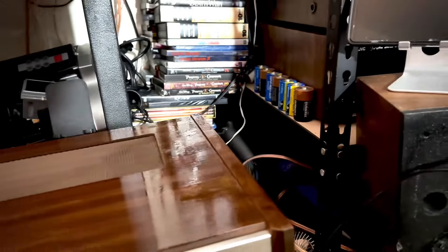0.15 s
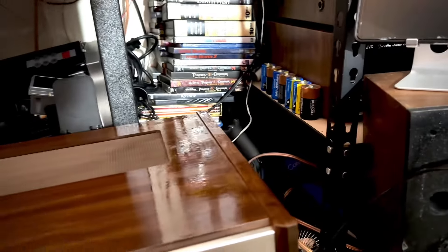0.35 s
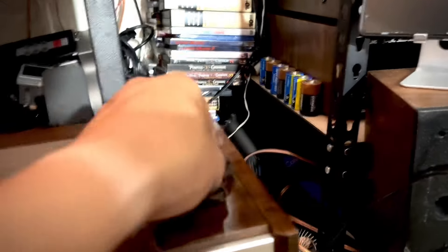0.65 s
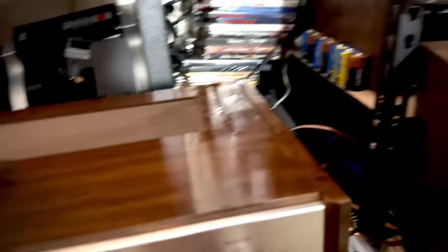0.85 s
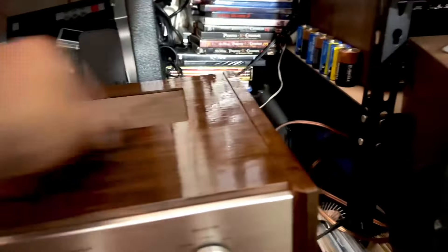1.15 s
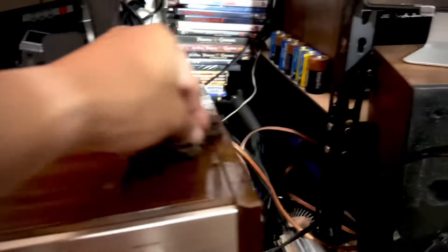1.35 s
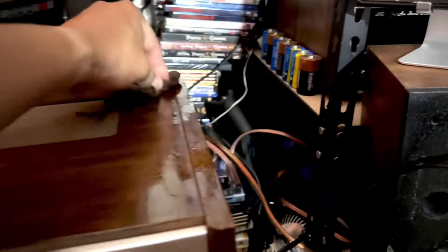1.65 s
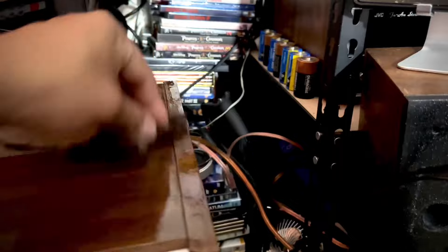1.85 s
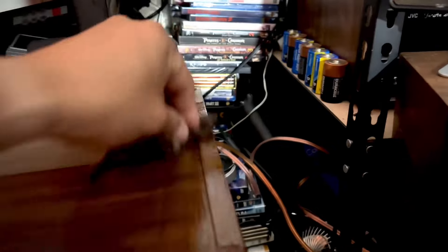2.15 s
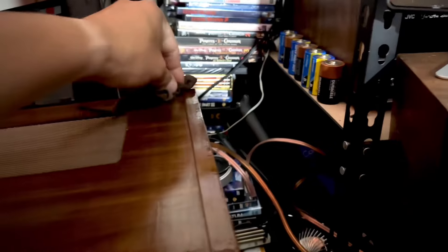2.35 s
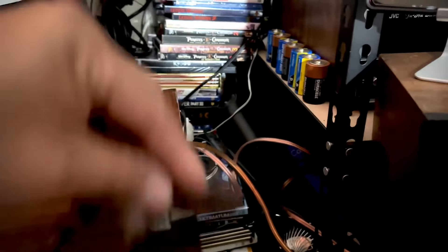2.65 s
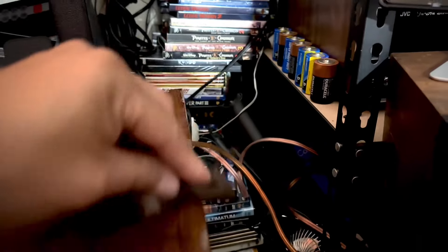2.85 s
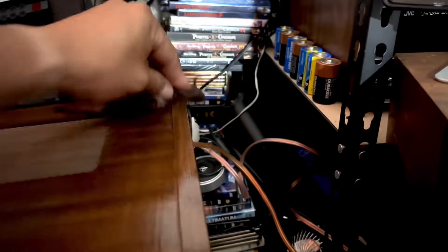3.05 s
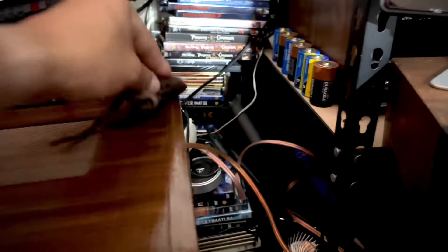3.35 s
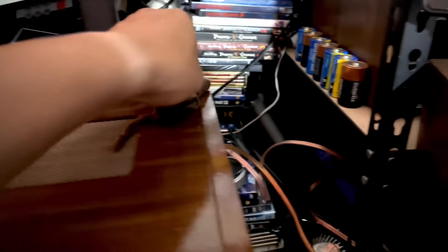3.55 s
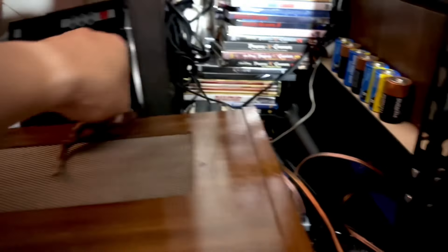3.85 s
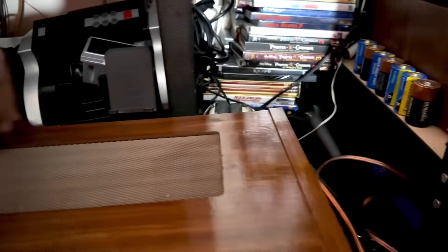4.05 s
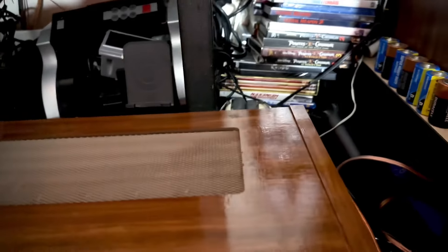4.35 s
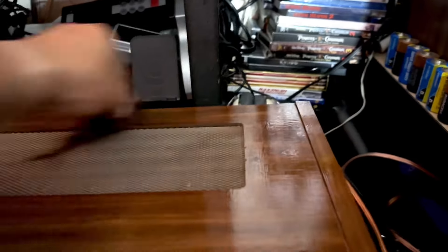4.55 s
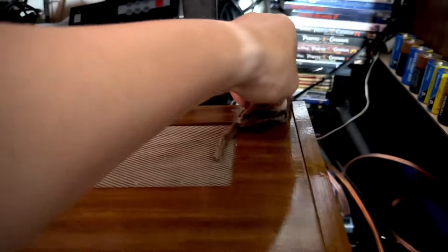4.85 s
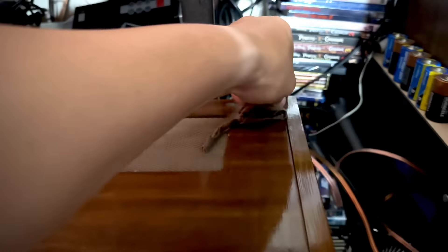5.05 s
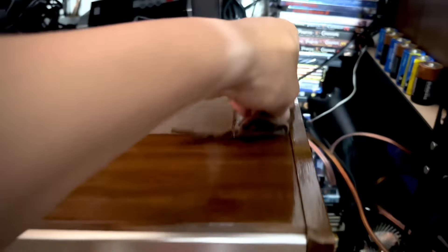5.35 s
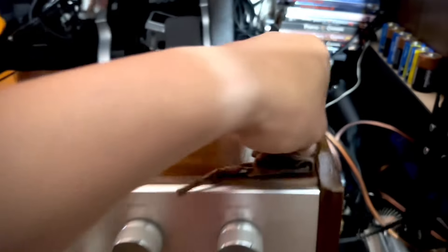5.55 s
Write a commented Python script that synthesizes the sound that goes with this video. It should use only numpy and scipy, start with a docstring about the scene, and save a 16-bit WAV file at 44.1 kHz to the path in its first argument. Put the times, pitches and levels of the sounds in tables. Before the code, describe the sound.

Very close stereo sound in a small, crowded room, with a short dull reflection and quiet low hum. From 0 to 1.7 s a folded rag makes five bright, breathy swishes on varnished wood, roughly 0.35 to 0.45 s each, swelling with hand speed and dipping at the turns; small catches tick near 0.4 and 1.0 s. From 1.7 to 2.4 s strokes are stronger, with a rasping woody judder at 1.9 s and a hollow rustle after it. From 2.4 to 3.5 s the rubbing is duller and woodier, with light bumps at 2.6, 3.1 and 3.3 s. A long stroke from 3.55 to 4.3 s carries thin, fuzzy squeaks and soft knocks around 4.0 to 4.1 s. After a brief dip, a muffled thud at 4.5 s leads to a loud scrubbing burst at 4.65 s. It quietens around 4.9 to 5.1 s, then a bump at 5.27 s and a softer wipe fading to the end.

```python
"""A small room, close to the microphone: a folded rag is wiped back and forth over a radio's varnished wooden case.
The fibres are shaped noise that hisses brighter as the hand speeds up; the cloth sticks and slips and rings the case.
Noise in bands and resonances adds scuffs, judders, soft coloured rubbing, catches, faint squeaks and a rim rustle.
The hand knocks softly on the panel: short decaying sines. Wavering low hum and rumble lie underneath."""
import sys
import numpy as np
from scipy import signal
from scipy.fft import rfft, irfft
from scipy.io import wavfile
from scipy.ndimage import map_coordinates

SR = 44100
rng = np.random.default_rng(int(sys.argv[2]) if len(sys.argv) > 2 else 0)


def waveform_to_disk(signal):
    """Save audio, clipped to [-1, 1], as 16-bit WAV at the path in sys.argv[1]."""
    frames = np.transpose(np.atleast_2d(signal))
    scaled = np.clip(frames, -1, 1) * 32767
    samples = np.round(scaled).astype(np.int16)
    wavfile.write(sys.argv[1], SR, samples)


N = 251811
TIME = np.arange(N) / SR
FREQS = np.fft.rfftfreq(N, 1 / SR)

# sweeps of the rag, with faint brushing that keeps the turns and pauses from falling silent; levels at full speed:
# (start [s], end [s], speeding up [s], slowing down [s],
# hiss [dB], top treble over the hiss [dB], coarse sizzle over the hiss [dB],
# then over the hiss, before the trims in wood(): hollow thrum [dB], panel rasp [dB], dry scrape [dB],
# pressure gained from start to end [dB])
STROKES = [(-0.15, 0.318, 0.3, 0.27, -48.5, 6.5, -4.5, -27, -15.5, -8.5, 13),
           (0.22, 0.667, 0.23, 0.093, -48, 3, -2, -13, -13.5, -11.5, -2.5),
           (0.648, 1.001, 0.16, 0.1, -48.5, 4.5, -3.5, -16.5, -13.5, -8, -2),
           (0.987, 1.338, 0.079, 0.18, -47.5, 4.5, -2.9, -8, -12.5, -12.5, 13),
           (1.299, 1.717, 0.18, 0.1, -48.5, 2, -4.5, -11, -11, -7, 2),
           (1.714, 2.043, 0.16, 0.16, -45, 5.5, -6, 0, -5, -5.5, 7.5),
           (1.992, 2.411, 0.089, 0.27, -45, 3.5, -7.5, -5, -12.5, -3, 10),
           (2.3, 2.761, 0.14, 0.25, -52.5, -15, -4, 2, -6, -11, 4.5),
           (2.681, 3.17, 0.18, 0.17, -51.5, -0.5, -4, -11.5, -3, 0, 6.5),
           (3.12, 3.324, 0.03, 0.085, -74.5, -22, 3, 5, -6, 1.5, -12),
           (3.302, 3.563, 0.22, 0.14, -52.5, -9, -0.5, 2.5, -4, -1, 6.5),
           (3.555, 4.278, 0.12, 0.088, -51, -3, -4.5, 2, -2.5, -1, 5.5),
           (4.222, 4.381, 0.044, 0.032, -64, -20, 5, -11, 2, 0.5, 12),
           (4.322, 4.837, 0.17, 0.19, -44.5, -7, -2, -4.5, -2.5, 1, -5.5),
           (4.784, 4.883, 0.02, 0.2, -64.5, -3, 4, 13, -1, -7, -16),
           (4.904, 5.074, 0.28, 0.042, -58.5, -7.5, 5.5, 0.5, -7, -1, 1),
           (5.05, 5.172, 0.03, 0.03, -80.5, -13, -1, 9, -2, -4, -4),
           (5.118, 5.78, 0.15, 0.32, -50, -6, 1, 0, -11, -4.5, -7)]


def amp(db):
    """Decibels to gain."""
    return 10 ** (np.asarray(db) / 20)


def unit(x):
    """Scales to rms 1."""
    return x / np.sqrt(np.mean(x ** 2) + 1e-20)


def over_hz(table, hz, order=1):
    """Reads one column of a table on a log-frequency axis."""
    columns = np.transpose(table)
    return np.interp(np.log(hz + 1), np.log(columns[0] + 1), columns[order])


def over_time(table, t=TIME):
    """Reads all columns of a curve at the times t."""
    s, *columns = np.transpose(table)
    return [np.interp(t, s, c) for c in columns]


def filtered(x, response):
    """Applies a frequency response."""
    return irfft(rfft(x) * response, N)


def resonance(hz, width_hz):
    """Response of one damped mode, gain 1 at its peak."""
    return 1j * FREQS * width_hz / (hz ** 2 - FREQS ** 2 + 1j * FREQS * width_hz)


def drift(rate_hz):
    """Smooth random curve of rms 1; its movement fades out above the given rate."""
    return unit(filtered(rng.standard_normal(N), np.exp(-(FREQS / rate_hz) ** 2)))


def whistle(hz, width_hz):
    """Noise in a resonance that follows the curve hz; one row for each port."""
    noise = rng.standard_normal((2, N)) + 1j * rng.standard_normal((2, N))
    r = np.exp(-np.pi * width_hz / SR)
    band = signal.lfilter([1], [1, -2 * r, r * r], noise)
    carrier = np.exp(2j * np.pi * np.cumsum(hz) / SR)
    return unit((band * carrier).real)


def sweep(start, end, rise, fall):
    """Speed of the hand, 0-1: it picks up, holds and slows to a stop."""
    up, down = np.clip([(TIME - start) / rise, (end - TIME) / fall], 0, 1)
    return np.sin(np.pi / 2 * up) * np.sin(np.pi / 2 * down)


def hand():
    """Sweep speed and pressure give hiss, brightness and sizzle [dB] and three drives of the wood [gain]."""
    # dB gained per dB of speed; wood: thrum, rasp, scrape
    hiss_law, bright_law, wood_laws = 0.9, 0.88, (0.61, 0.79, 0.81)
    power, colour, drives = np.full(N, 1e-12), np.zeros((2, N)), np.zeros((3, N))
    for start, end, rise, fall, hiss_db, bright_db, sizzle_db, *wood_db, press_db in STROKES:
        speed = sweep(start, end, rise, fall)
        on = speed > 0
        speed_db = 20 * np.log10(speed[on])
        progress = (TIME[on] - start) / (end - start)
        hiss = amp(hiss_db + hiss_law * speed_db) ** 2
        power[on] += hiss
        # overlapping sweeps share the colour by their power
        colour[0, on] += hiss * (bright_db + bright_law * speed_db)
        colour[1, on] += hiss * sizzle_db
        for drive, db, law in zip(drives, wood_db, wood_laws):
            drive_db = hiss_db + db + law * speed_db + press_db * (progress - .5)
            drive[on] += amp(drive_db) ** 2
    return (10 * np.log10(power), *(colour / power)), np.sqrt(drives)


def friction(grain_db, grain_hz, clump_db, clump_hz):
    """Countless tiny slips of the threads, bunched into grains and slower clumps; one row for each port."""
    bunching_db = grain_db * drift(grain_hz) + clump_db * drift(clump_hz)
    return unit(rng.standard_normal((2, N)) * amp(bunching_db))


def fibres(controls, level_db=0.0):
    """Hiss of the weave on the varnish; speed lifts its treble, each sweep has its own sizzle."""
    # relative colour of the hiss at brightness 0: (pitch [Hz], density [dB per Hz])
    fibre_colour = [(300, -24), (1500, -15), (2700, -13), (3600, -3), (5300, 0), (6100, 1), (7000, -2),
                    (8700, 4.5), (10000, 3.5), (12500, 2.5), (14000, -2.5), (15500, 0.5)]
    # how much of the brightness reaches each pitch: (pitch [Hz], share)
    brightening = [(4000, -0.024), (5500, 0.042), (7000, 0.29), (9000, 0.73), (11500, 1), (14000, 0.85)]
    sizzle_hz, sizzle_width_hz = 8470, 1880  # the coarse weave sizzles in one treble band
    slips = friction(grain_db=0.5, grain_hz=620, clump_db=0.56, clump_hz=56)
    hz, t, z = signal.stft(slips, SR, nperseg=256)
    hiss_db, bright_db, sizzle_db = (np.interp(t, TIME, c) for c in controls)
    colour = amp(over_hz(fibre_colour, hz))
    middle = (hz > 3500) & (hz < 7500)  # the band that sets the level
    colour /= np.sqrt(np.mean(colour ** 2 * middle))
    field_db = hiss_db + level_db + over_hz(brightening, hz)[:, None] * bright_db
    sizzle_band = np.exp(-((hz[:, None] - sizzle_hz) / sizzle_width_hz) ** 2)
    field_db = field_db + sizzle_band * sizzle_db
    return signal.istft(z * colour[:, None] * amp(field_db), SR, nperseg=256)[1][:, :N]


def case_response():
    """The wooden case: a plain panel response combined with damped modes."""
    # modes of the case: (pitch [Hz], width [Hz], gain relative to the plain panel [dB])
    case_modes = [(232, 23, 5.5), (333.8, 23, 6.5), (448, 170, -6.5), (923, 14, 4), (1080, 370, -3.5),
                  (1200, 10, 0.5), (1252, 50, -3.5), (1400, 12, 5.5), (1685, 22, 2), (1780, 11, -8),
                  (1850, 17, -7), (2310, 28, -17), (2630, 28, -13), (3310, 13, -22)]
    return 1 + sum(amp(db) * resonance(hz, width) for hz, width, db in case_modes)


def wood(case, drives, thrum_db=-9.5, rasp_db=-2.5, scrape_db=-2.5):
    """Stick and slip drives the case, as hard as the hand sweeps and presses."""
    # relative spectra of three ways the friction drives the wood: (pitch [Hz], density [dB per Hz])
    thrum_shape = [(25, -49), (60, -14), (130, -12), (220, -9.5), (360, 0.5), (480, 0.5), (600, -5),
                   (780, -7.5), (1500, -37)]
    rasp_shape = [(400, -24), (760, -17.5), (920, 1), (1200, 7.5), (1550, 10.5), (1900, -3.5), (2500, -36),
                  (5000, -66)]
    scrape_shape = [(900, -27), (1500, -16), (2000, 1), (2600, 1.5), (3200, -0.5), (4200, 4), (8000, -67.5)]
    slips = friction(grain_db=0.0, grain_hz=338, clump_db=1.57, clump_hz=43.0)
    shapes, trims_db = (thrum_shape, rasp_shape, scrape_shape), (thrum_db, rasp_db, scrape_db)
    out = 0
    for shape, drive, db in zip(shapes, drives, trims_db):
        response = case * amp(over_hz(shape, FREQS))
        response = response / np.sqrt(np.mean(abs(response) ** 2))
        out = out + filtered(slips * drive * amp(db), response)
    return out


def folds(x, patchy_db=2.3, patch_s=.13, patch_hz=230):
    """The folds of the rag shift under the hand, so its colour wanders in broad random patches."""
    hz, t, z = signal.stft(x, SR, nperseg=512)
    field = rng.standard_normal((len(t), len(hz))).T
    # blur the random field along pitch, then along time
    for axis, size in ((0, patch_hz / hz[1]), (1, patch_s / t[1])):
        kernel = np.exp(-(2 * np.arange(-60, 61) / size) ** 2)
        field = signal.fftconvolve(field, np.expand_dims(kernel, 1 - axis), "same", axes=axis)
    gain = unit(amp(patchy_db * unit(field)))
    return signal.istft(z * gain, SR, nperseg=512)[1][:, :N]


def drive_case(case, force, hz, width_hz):
    """A noisy force in one band rings the case; the response is scaled to keep the force's level."""
    response = case * resonance(hz, width_hz * 1.22) ** 2  # two passes narrow the band, so each is wider
    return filtered(force, response / np.sqrt(np.mean(abs(response) ** 2)))


def band_swells(case):
    """Swells of noise in one band through the case: short scuffs and judders, longer soft coloured rubbing."""
    # swells, weaker while the hand is slow:
    # (peak time [s], length [s], centre [Hz], nominal width [Hz], level at full grip [dB])
    swell_rows = [(0.134, 0.15, 347, 160, -62), (0.14, 1, 890, 100, -70.5), (0.49, 0.19, 360, 197, -59),
                  (0.881, 0.11, 344, 120, -59.5), (0.898, 0.11, 890, 90, -67), (1.055, 0.03, 874, 110, -56),
                  (1.133, 0.14, 347, 157, -57), (1.042, 0.03, 2200, 1500, -52),
                  (1.283, 0.032, 3260, 4000, -48.5), (1.564, 0.2, 1300, 1300, -54.5),
                  (1.829, 0.096, 147, 80, -52.5), (1.859, 0.071, 1135, 418, -36.5),
                  (1.851, 0.021, 1810, 450, -41), (1.887, 0.022, 1480, 400, -39),
                  (1.928, 0.21, 1950, 800, -45.5), (1.92, 0.042, 5000, 2500, -45),
                  (2.002, 0.085, 179, 120, -57), (2.562, 0.35, 159, 120, -64), (2.538, 0.2, 3100, 900, -60),
                  (2.532, 0.39, 403, 110, -63.5), (2.953, 0.19, 4950, 910, -50),
                  (3.003, 0.13, 413, 220, -58.5), (3.107, 0.038, 1960, 1800, -50.5),
                  (3.452, 0.038, 1300, 1100, -49), (3.782, 0.031, 57.6, 39.6, -52.5),
                  (3.958, 0.16, 235, 70, -57), (4.118, 0.24, 1820, 696, -49.5),
                  (4.314, 0.075, 4150, 200, -60.5), (4.399, 0.054, 1243, 400, -41.5),
                  (4.446, 0.058, 2350, 500, -48), (4.467, 0.037, 1050, 254, -43.5),
                  (4.05, 0.6, 6900, 1000, -56.5), (4.11, 0.27, 500, 200, -58), (4.545, 0.34, 464, 230, -50),
                  (4.623, 0.12, 2670, 320, -48.5), (4.65, 0.1, 3230, 1090, -42),
                  (4.64, 0.081, 935, 89, -47), (5.02, 0.05, 3540, 2000, -54.5),
                  (5.137, 0.3, 1120, 500, -65), (5.286, 0.15, 726, 216, -56.5), (5.353, 0.5, 167, 90, -68),
                  (5.49, 0.39, 4100, 800, -54), (5.618, 0.55, 705, 300, -64.5)]
    grip_speed = .42  # share of full speed below which the swells weaken
    speed = np.max([sweep(*row[:4]) for row in STROKES], axis=0)
    slips = friction(grain_db=1.5, grain_hz=200, clump_db=0.9, clump_hz=40)
    slips = slips * np.minimum(speed / grip_speed, 1)
    out = 0
    for s, length, hz, width, db in swell_rows:
        swell = amp(db) * np.exp(-(2 * (TIME - s) / length) ** 2)
        out = out + drive_case(case, slips * swell, hz, width)
    return out


def bumps(case):
    """The cloth catches on the case and tears free: a short rasp of slips that dies away."""
    # catches: (time [s], level [dB], centre [Hz], nominal width [Hz], attack [s], t60 of the force [s])
    catches = [(.372, -47.5, 2380, 3500, 0.0026, 0.09), (1.009, -50.5, 4960, 5000, 0.0033, 0.16),
               (1.114, -53, 378, 250, 0.0031, 0.058), (1.553, -54, 500, 704, 0.0058, 0.64),
               (1.73, -52, 4160, 4030, 0.0089, 0.18), (2.577, -49, 9000, 5000, 0.0018, 0.031),
               (3.076, -53.5, 342, 200, 0.0043, 0.13), (3.113, -45, 3240, 4000, 0.0048, 0.065),
               (3.094, -53, 560, 600, 0.004, 0.18), (3.324, -47.5, 1260, 1400, .003, 0.14),
               (3.328, -54, 630, 240, 0.003, 0.22), (3.584, -51, 4060, 4550, 0.0044, 0.49),
               (4.013, -49.5, 557, 400, 0.003, 0.2), (4.098, -43.5, 686, 700, 0.004, 0.07),
               (4.501, -47, 426, 296, 0.0053, 0.17), (4.651, -35.5, 2870, 1500, 0.0078, .045),
               (4.915, -73, 6470, 6000, .004, 0.15), (5.044, -62, 1130, 896, 0.0024, 0.18),
               (5.263, -47, 925, 700, 0.0072, 0.09), (5.288, -50, 706, 400, 0.0028, .06)]
    push = rng.standard_normal((2, N))
    out = 0
    for s, db, hz, width, attack, t60 in catches:
        onset = np.clip((TIME - s) / attack, 0, 1)
        decay = np.exp(-np.log(1000) * np.maximum(TIME - s - attack, 0) / t60)
        out = out + drive_case(case, push * (onset * decay) * amp(db), hz, width)
    return out


def squeak(width_hz=120, level_db=-3.5, slip_db=1.8, slip_hz=90, wobble_hz=45, fade_s=0.012):
    """Threads slip in step for a moment, each time at a new pitch: a broken, fuzzy whistle."""
    # thin squeaks of cloth on varnish:
    # (start [s], end [s], first pitch [Hz], last pitch [Hz], level before level_db [dB])
    squeak_glides = [(3.377, 3.432, 5340, 5170, -53), (3.585, 3.682, 4950, 5110, -62),
                     (3.665, 3.725, 5256, 5430, -55), (3.714, 3.791, 5930, 6020, -52.5),
                     (3.741, 3.827, 5870, 6060, -53), (3.846, 3.909, 6020, 6080, -55),
                     (3.902, 3.95, 5750, 5610, -60), (3.937, 4.02, 6120, 6070, -50),
                     (4.015, 4.095, 6340, 6370, -53), (4.076, 4.129, 6390, 6070, -47.5),
                     (4.144, 4.231, 5730, 5530, -52), (4.234, 4.253, 6150, 6300, -54),
                     (4.26, 4.301, 6150, 6360, -51), (4.317, 4.353, 6460, 6160, -50.5)]
    chirps = [amp(db) * sweep(start, end, fade_s, fade_s) for start, end, _, _, db in squeak_glides]
    chirps = np.array(chirps) ** 2 + 1e-18
    glides = np.array([np.interp(TIME, row[:2], row[2:4]) for row in squeak_glides])
    power = chirps.sum(0)
    hz = (chirps * glides).sum(0) / power + wobble_hz * drift(slip_hz)  # the loudest glide leads
    breaks = unit(amp(slip_db * np.clip(drift(slip_hz), -2, 1)))
    return whistle(hz, width_hz) * amp(level_db) * np.sqrt(power) * breaks


def rim(width_hz=470, wander_hz=80, flutter_db=1.6, shift_hz=16):
    """Hollow rustle: friction along the rim sounds through one broad resonance that wanders and flutters."""
    # runs along the rim: (start [s], end [s], swelling [s], fading [s], level [dB], resonance [Hz])
    rim_runs = [(1.858, 2.297, 0.041, .36, -50.5, 1994), (2.1, 2.859, 0.359, 0.27, -55.5, 2160),
                (3.179, 3.323, 0.026, 0.12, -68, 2088), (5.169, 5.85, 0.17, 0.22, -58, 2025)]
    runs = np.array([amp(db) * sweep(*timing) for *timing, db, hz in rim_runs]) ** 2 + 1e-16
    power = runs.sum(0)
    hz = np.array(rim_runs)[:, -1] @ runs / power + wander_hz * drift(shift_hz)
    flutter = unit(amp(flutter_db * drift(shift_hz)))
    return whistle(hz, width_hz) * np.sqrt(power) * flutter


def knocks(level_db=0.0):
    """A cushioned blow swings the panel at the pitch of the spot it lands on, with a shorter overtone."""
    # knuckles through the cloth: (time [s], level of the main mode [dB], pitch [Hz], attack [s], t60 [s])
    knuckle_blows = [(1.116, -49, 387, .005, .08), (2.577, -46, 1244, .002, 0.043),
                     (3.326, -45, 985, 0.0053, 0.057), (3.328, -50.5, 543, 0.0028, 0.16),
                     (3.997, -37.5, 404, 0.0023, 0.023), (4.014, -40, 470, .002, .04),
                     (4.098, -43.5, 594, .003, 0.1), (4.502, -37, 335.4, 0.014, 0.23),
                     (5.051, -51.5, 342, 0.0045, 0.12), (5.266, -41.5, 665, .003, .045)]
    ratio, over_db, shorter = 2.4, -18, .55  # second mode: times the pitch, level [dB], share of the t60
    out = np.zeros(N)
    for s, db, hz, attack, t60 in knuckle_blows:
        t = np.maximum(TIME - s, 0)
        fade_db = -60 * np.maximum(t - attack, 0) / t60
        phase = 2 * np.pi * hz * t
        main = amp(db + fade_db) * np.sin(phase)
        overtone = amp(db + over_db + fade_db / shorter) * np.sin(ratio * phase)
        out += np.minimum(t / attack, 1) * (main + overtone)
    return amp(level_db) * out


def ports(x):
    """Two spaced microphone ports hear the sound partly alike, shifted in phase and level."""
    # the pair of ports: (pitch [Hz], likeness [0-1], phase lag the housing gives the right one [rad])
    port_pair = [(50, .6, 0), (330, .97, -.15), (700, .76, .1), (1050, .8, -1.15), (1500, .75, -.3),
                 (2100, .7, 0), (3200, .52, .3), (4500, .42, 0), (7000, .28, 0), (8300, .66, -.3),
                 (9600, .56, -1.6), (10400, .7, -2.6), (11300, .9, -3.1), (13000, .68, -5.1),
                 (14000, .93, -6.28), (15200, .93, -6.28), (16000, .78, -6.6)]
    # (pitch [Hz], left over right [dB])
    balance = [(100, -1.5), (280, 1.5), (520, 2), (1100, 1), (2200, -2.5), (4500, 0.7), (9000, -0.3),
               (14000, 0)]
    a, b = rfft(x)
    alike = np.clip(over_hz(port_pair, FREQS), 0, 1)
    right = alike * a + np.sqrt(1 - alike ** 2) * b
    right = right * np.exp(-1j * over_hz(port_pair, FREQS, order=2))
    lean = amp(over_hz(balance, FREQS) / 2)
    return irfft(np.array([a * lean, right / lean]), N)


def leaning(x):
    """The arm shades one port or the other, differently below and above a split pitch."""
    # lean as hand and arm move: (time [s], left over right of the wood [dB], left over right of the hiss [dB])
    arm_lean = [(.2, -1, 2), (.6, 1.5, -0.3), (1.3, 0.7, -0.95), (1.62, 2, -0.43), (1.85, -2.5, 0.58),
                (2.2, 0, -.3), (2.5, 0, 2), (2.7, -3, 1), (3.0, 3, -0.73), (3.35, 2, -0.5),
                (3.8, 1.8, -0.5), (4.28, 0.5, 1.1), (4.65, 2, -.7), (5.2, -1, -1.3), (5.7, 0, -0.8)]
    split_hz = 2100
    body = filtered(x, 1 / (1 + (FREQS / split_hz) ** 8))
    out = 0
    for part, db in zip((body, x - body), over_time(arm_lean)):
        out = out + part * amp(np.array([db, -db]) / 2)
    return out


def placed(x):
    """The right port hears the low and middle range later when the hand is off to the left."""
    # where the hand works: (time [s], delay of the right port [ms])
    hand_place = [(1.72, 0.39), (1.8, 0.04), (2.2, 0.049), (2.3, 0.19), (2.42, 0.01), (2.72, 0.0073),
                  (2.82, 0.39), (4.85, 0.35), (4.95, 0.056)]
    near_hz = 7330  # the delay acts below this pitch
    low = filtered(x[1], 1 / (1 + (FREQS / near_hz) ** 24))
    late = np.arange(N) - over_time(hand_place)[0] * SR / 1000
    return np.array([x[0], x[1] - low + map_coordinates(low, [late], order=3)])


def bounce(x, share=.22, delay_ms=.75, swing_ms=.13, sway_hz=1.6):
    """The varnish mirrors the treble to each port along a randomly drifting path: a soft, shifting comb."""
    mirror_hz = 2500  # only pitches above this are mirrored
    late = [np.arange(N) - (delay_ms + swing_ms * drift(sway_hz)) * SR / 1000 for _ in x]
    treble = filtered(x, 1 - 1 / (1 + (FREQS / mirror_hz) ** 4))
    mirrored = [map_coordinates(port, [at], order=3) for port, at in zip(treble, late)]
    return x + share * np.array(mirrored)


def room(x, wet_db=-15, t60=0.21, dull_hz=4500):
    """A short, dull tail from the crowded shelves: decaying noise as the room's response."""
    tail = rng.standard_normal((2, N)) * np.exp(-np.log(1000) * TIME / t60) * (TIME > .003)
    tail /= np.linalg.norm(tail, axis=1, keepdims=True)
    return amp(wet_db) * filtered(x, rfft(tail) / (1 + 1j * FREQS / dull_hz))


def background(throb=0.37, hum_apart=0.64):
    """Low room noise, handling rumble and a slightly wavering hum that reaches the ports out of step."""
    # relative spectrum of the still room: (pitch [Hz], density [dB per Hz])
    floor_colour = [(20, -30), (40, -20), (58, 5.5), (100, 3.5), (170, -6), (300, -6), (600, -38),
                    (2000, -21), (7000, -28), (15000, -48)]
    # two low tones and a faint higher one: (pitch [Hz], width [Hz], level before the hum curve [dB])
    hum_tones = [(68.3, 2.45, -64.5), (58.4, 1.3, -76), (243.4, 1.6, -73.5)]
    # the hum as the microphone is carried about: (time [s], level change [dB])
    hum_curve = [(0, -1.5), (4.2, -1), (4.45, -5), (5.1, -5), (5.3, 0)]
    # rumble of the microphone moving in the other hand: (time [s], level [dB])
    handling = [(0, -71), (1.6, -71), (1.85, -65), (2.25, -63), (2.75, -64), (3.0, -70), (3.5, -69),
                (3.85, -63), (4.3, -71), (4.6, -82), (5.3, -75)]
    floor_db, rumble_hz, rumble_width_hz = -70, 52.6, 87
    air = filtered(rng.standard_normal((2, N)), amp(over_hz(floor_colour, FREQS)))
    air = amp(floor_db) * unit(air)
    rumble = filtered(rng.standard_normal((2, N)), resonance(rumble_hz, rumble_width_hz) ** 2)
    rumble = unit(rumble) * amp(over_time(handling)[0])
    hum = 0
    for hz, width, db in hum_tones:
        phase = 2 * np.pi * np.cumsum(hz + width / 2 * drift(width)) / SR
        tone = (1 + throb * drift(width)) * np.sin([phase, phase + hum_apart])
        hum = hum + amp(db) * unit(tone)
    return air, hum * amp(over_time(hum_curve)[0]) + rumble


def scene():
    """The rag on the case, its room and the background."""
    case = case_response()
    controls, drives = hand()
    wiping = folds(fibres(controls) + wood(case, drives))
    rub = wiping + band_swells(case) + bumps(case) + squeak() + rim()
    thuds = knocks()
    air, low = background()
    direct = bounce(placed(leaning(ports(rub + air) + thuds)))
    return direct + room(rub + thuds) + low


def record(dry):
    """The recorder's low cut, deep treble notch and band limit."""
    low_cut_hz, edge_hz = 24, 15850
    notch_hz, notch_width_hz, notch_db = 11400, 850, -40
    dry = filtered(dry, 1 - 1 / (1 + (FREQS / low_cut_hz) ** 4))
    dry = filtered(dry, amp(notch_db * np.exp(-((FREQS - notch_hz) / notch_width_hz) ** 4)))
    lowpass = signal.firwin(511, edge_hz, window=("kaiser", 9), fs=SR)
    return signal.oaconvolve(dry, lowpass[None], "same")


dry = scene()
out = record(dry)
waveform_to_disk(out)
```